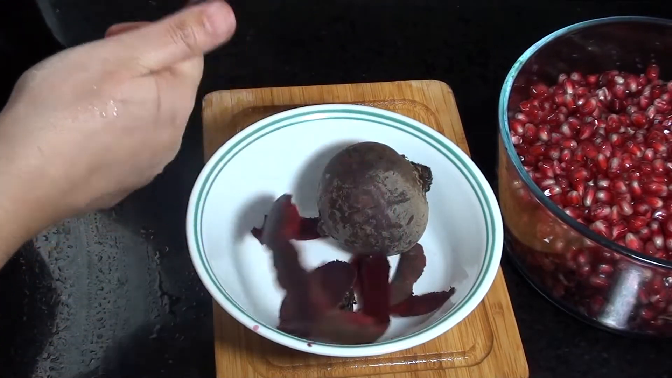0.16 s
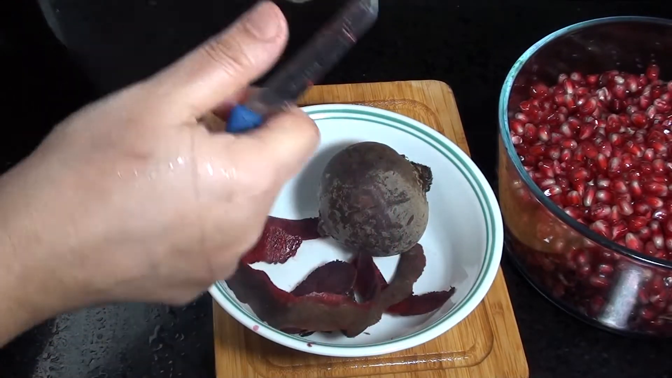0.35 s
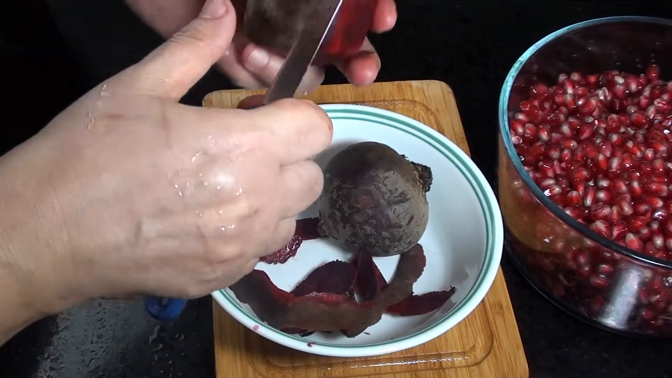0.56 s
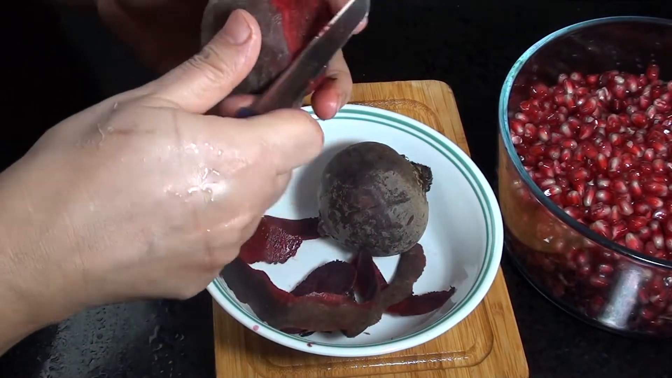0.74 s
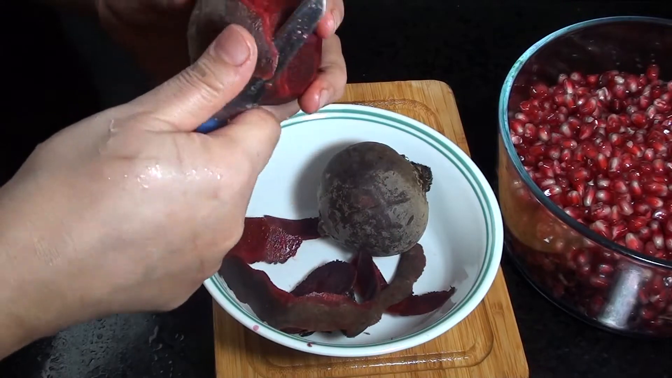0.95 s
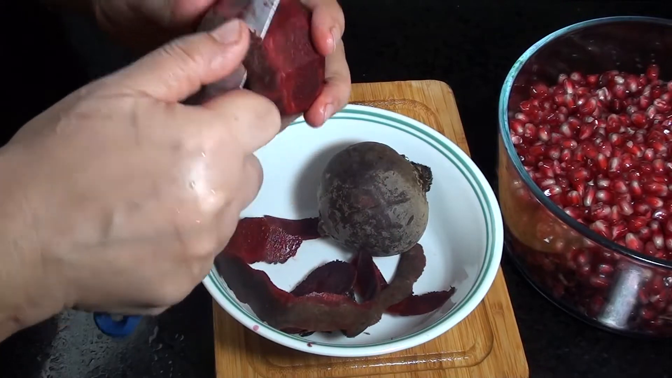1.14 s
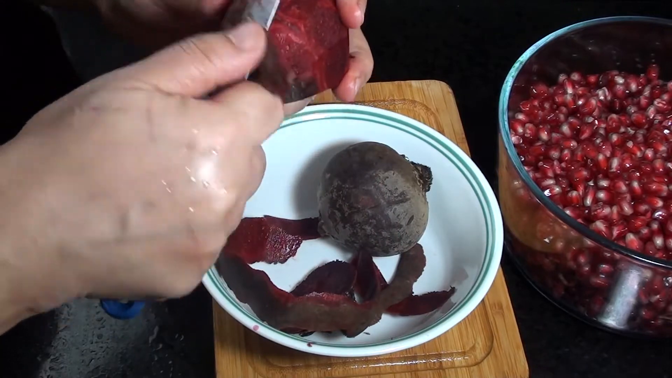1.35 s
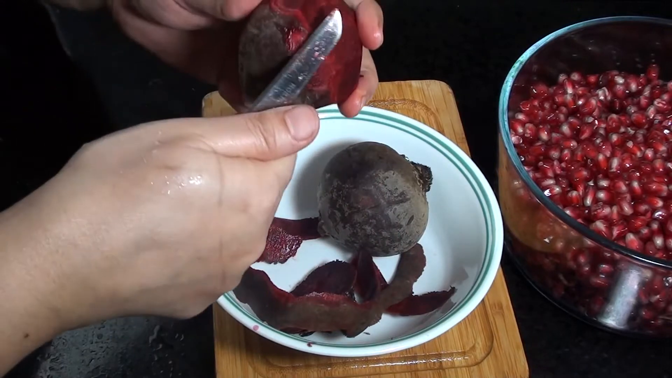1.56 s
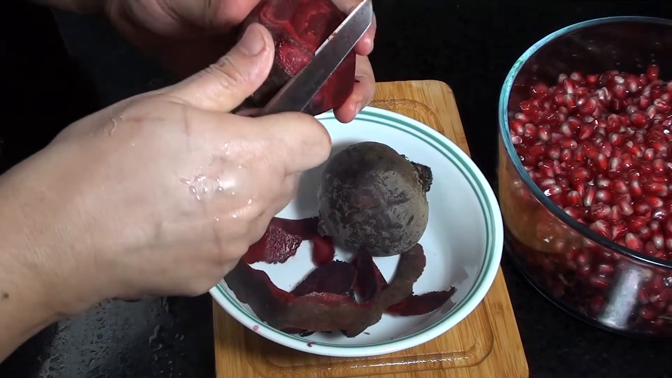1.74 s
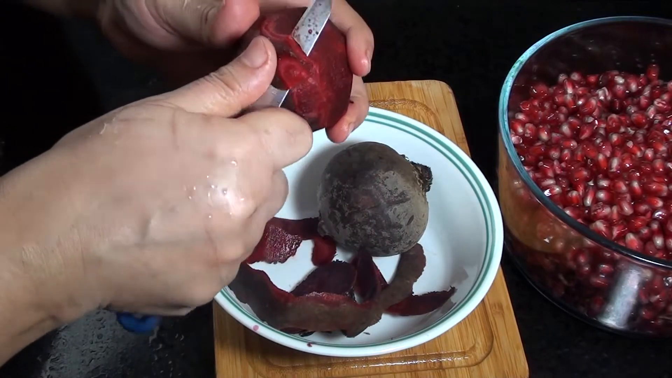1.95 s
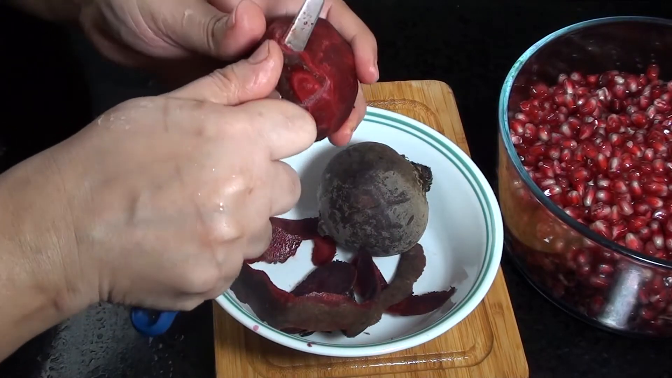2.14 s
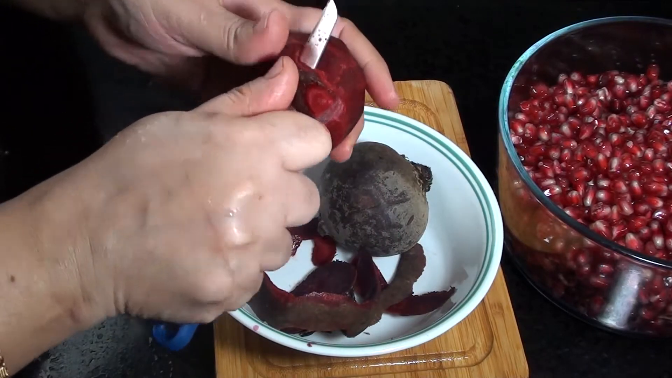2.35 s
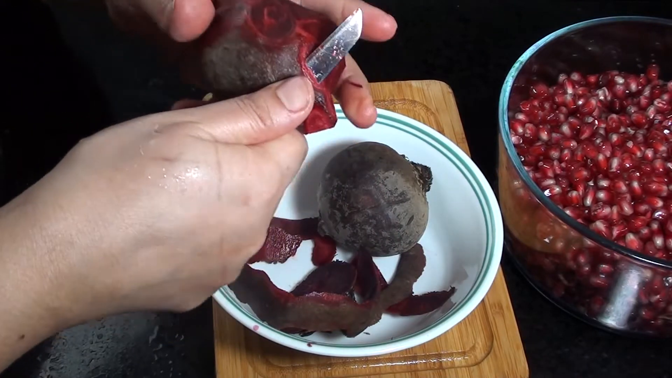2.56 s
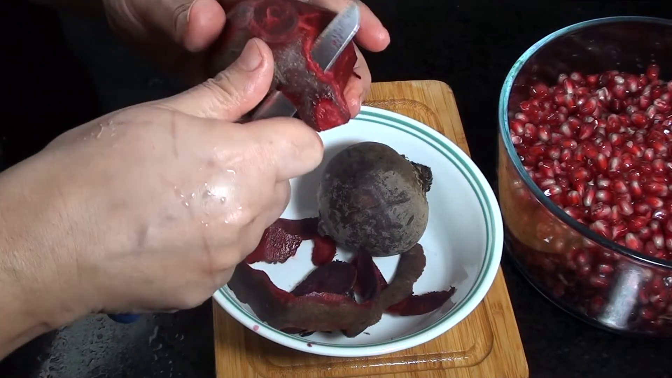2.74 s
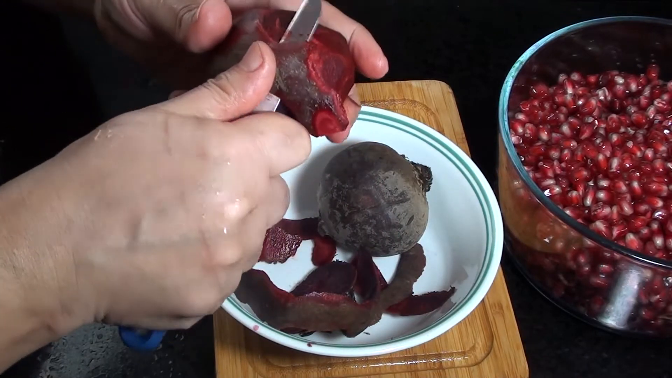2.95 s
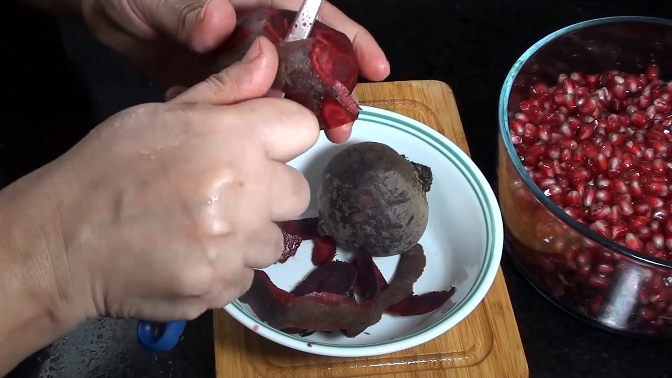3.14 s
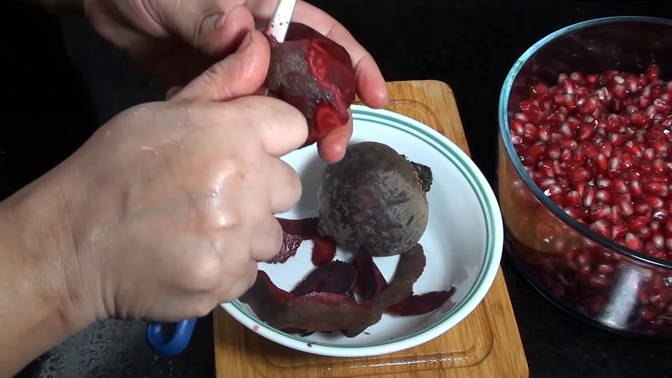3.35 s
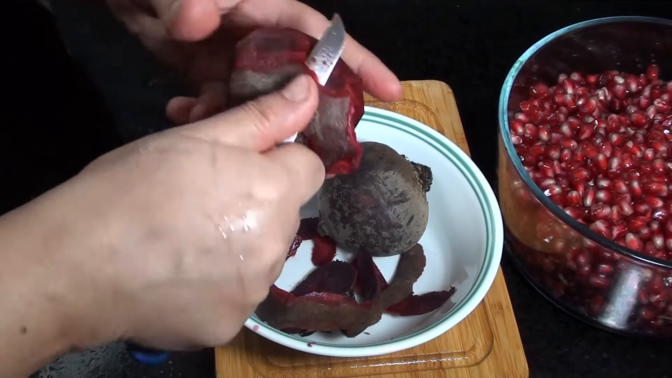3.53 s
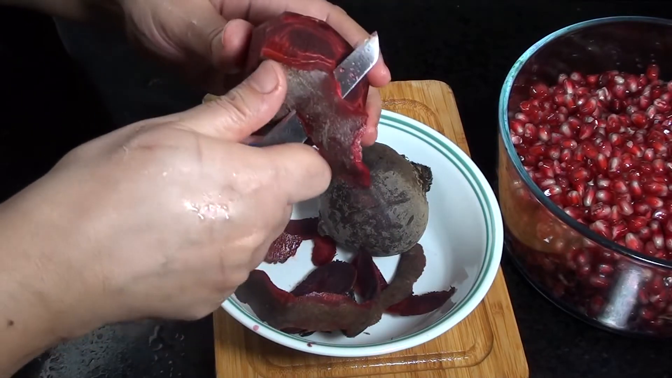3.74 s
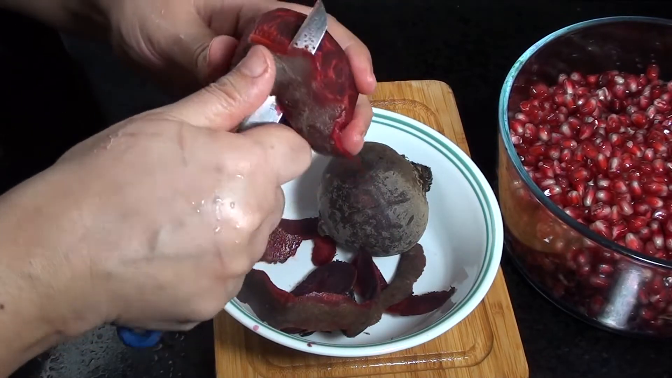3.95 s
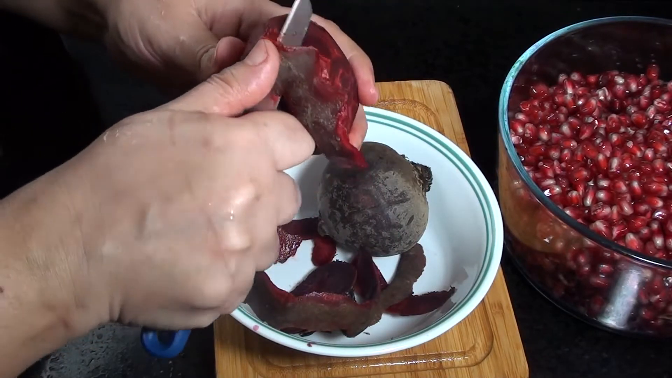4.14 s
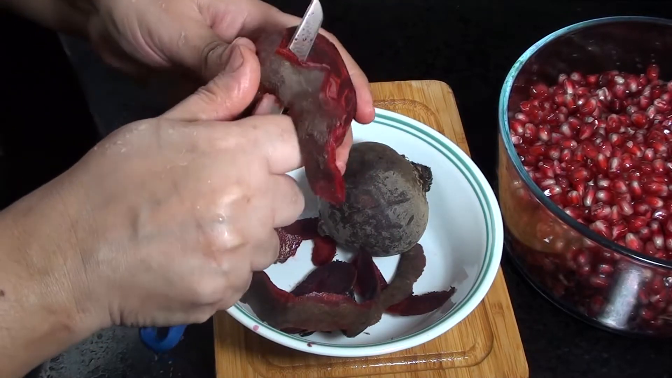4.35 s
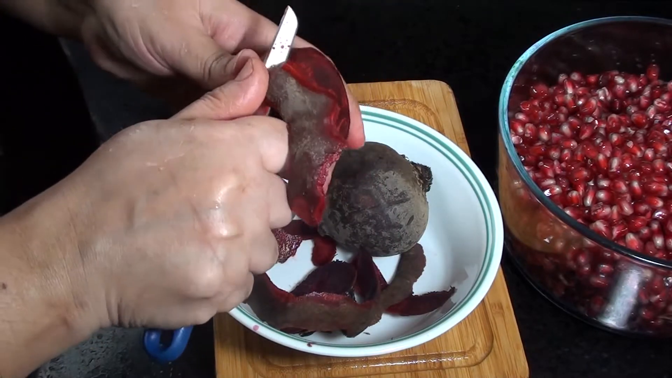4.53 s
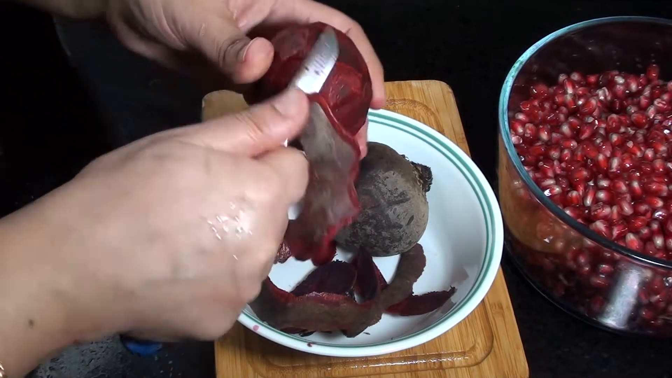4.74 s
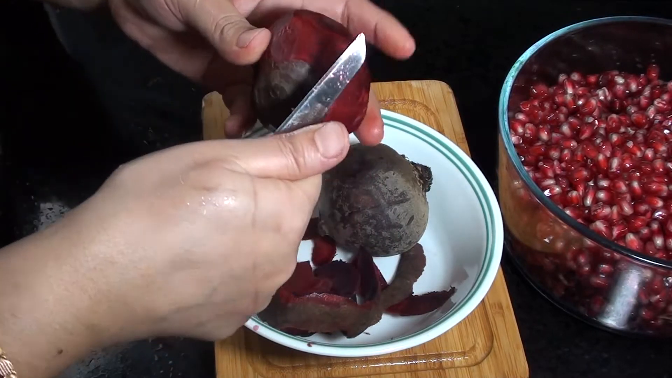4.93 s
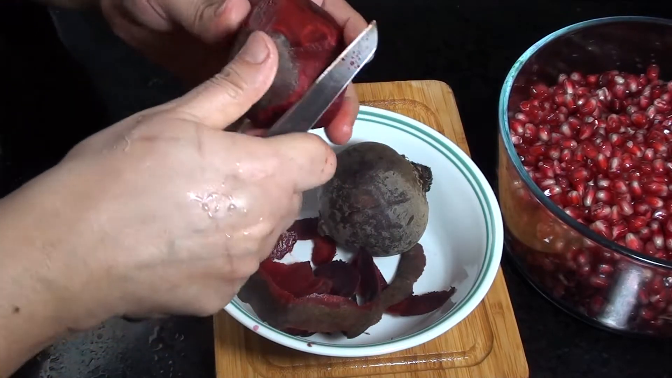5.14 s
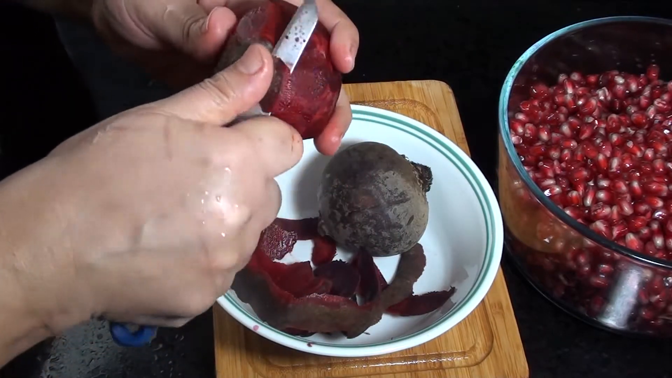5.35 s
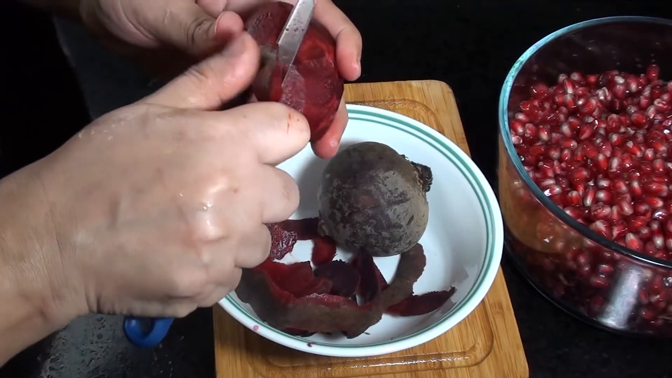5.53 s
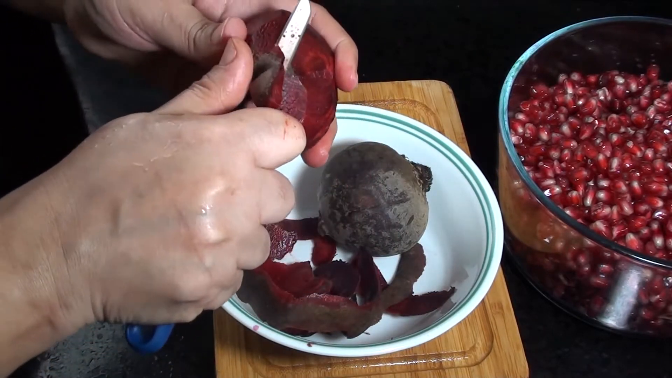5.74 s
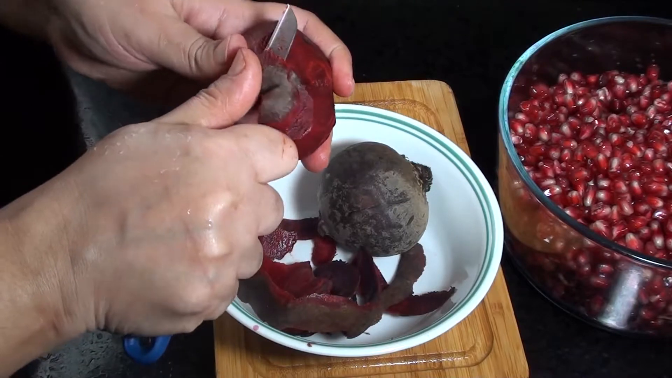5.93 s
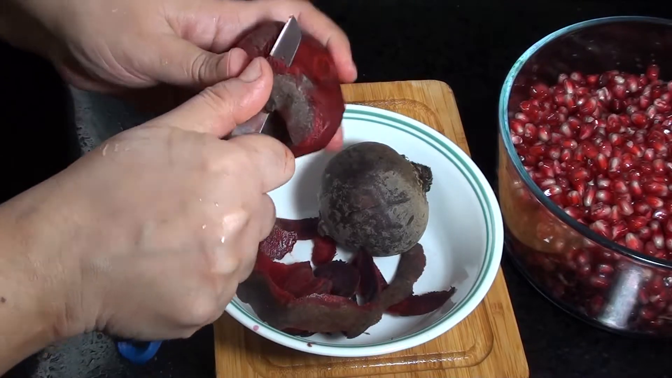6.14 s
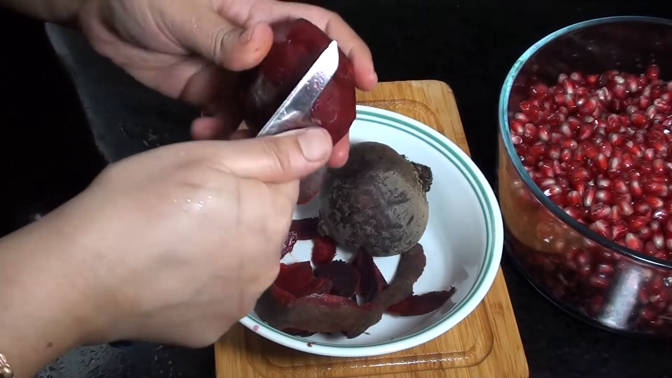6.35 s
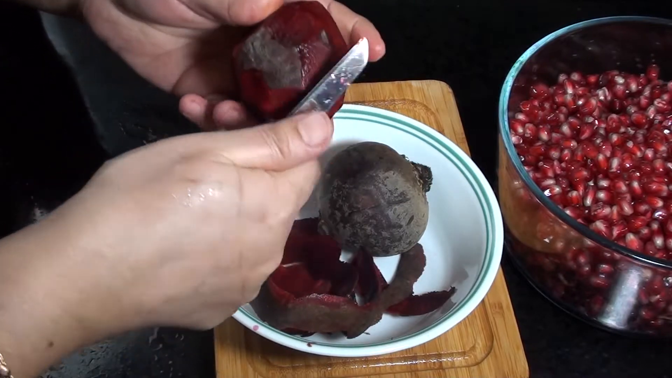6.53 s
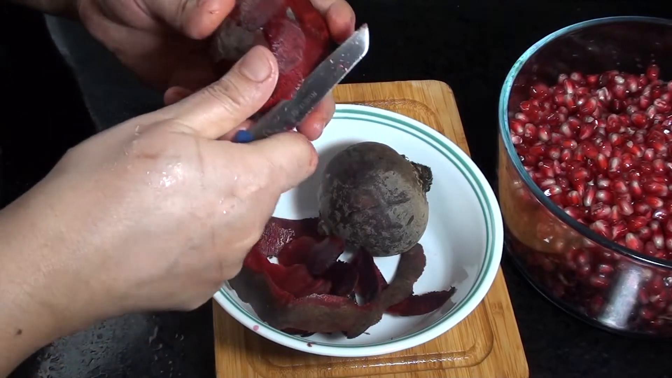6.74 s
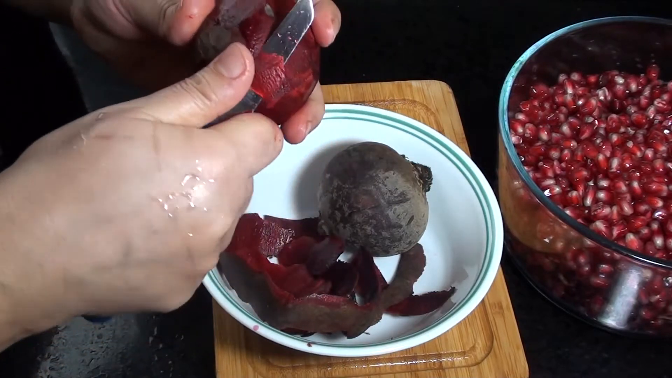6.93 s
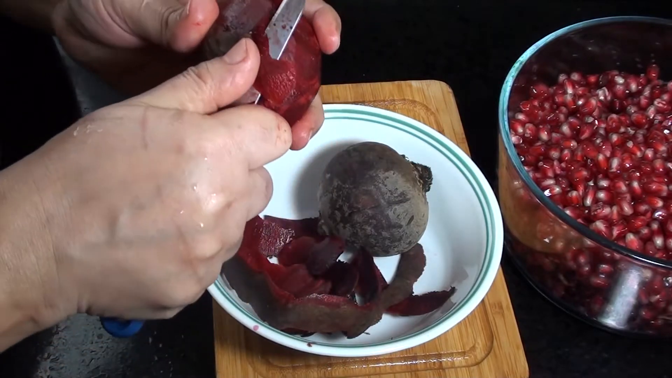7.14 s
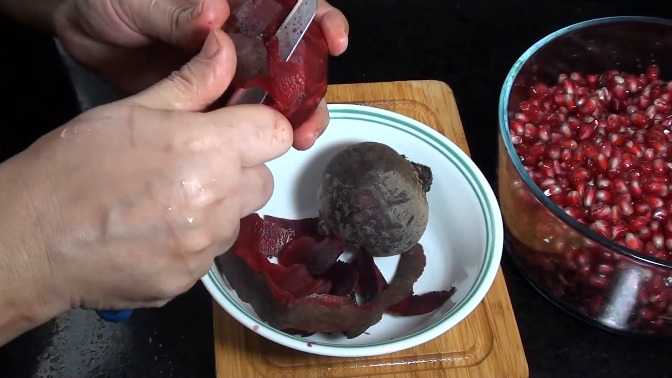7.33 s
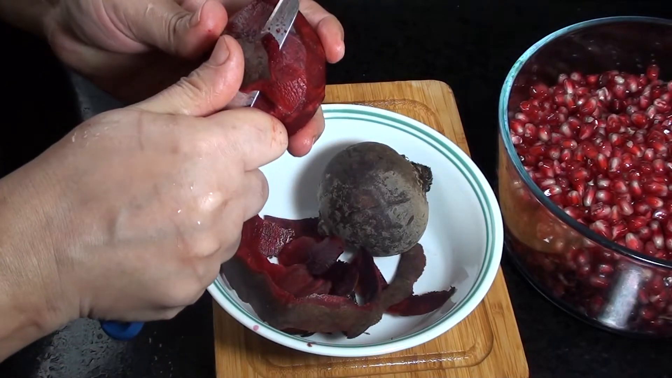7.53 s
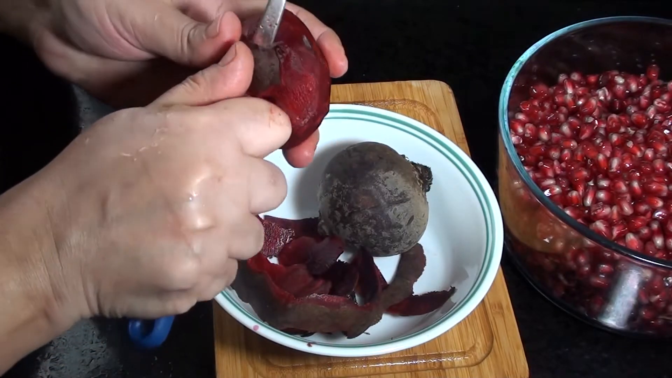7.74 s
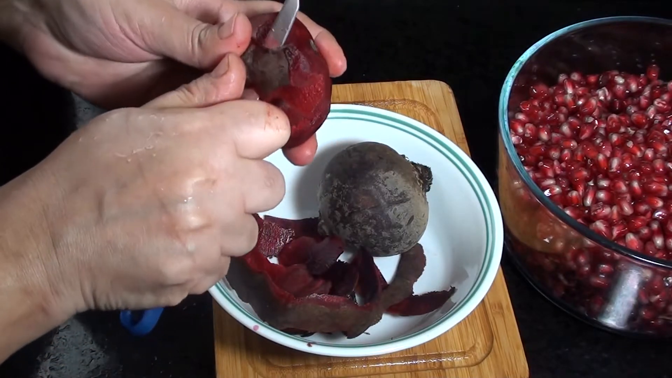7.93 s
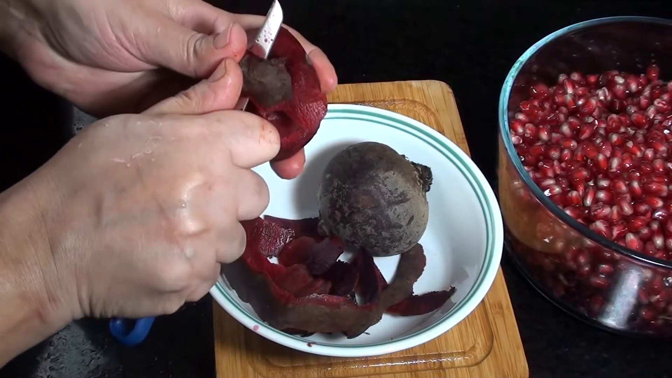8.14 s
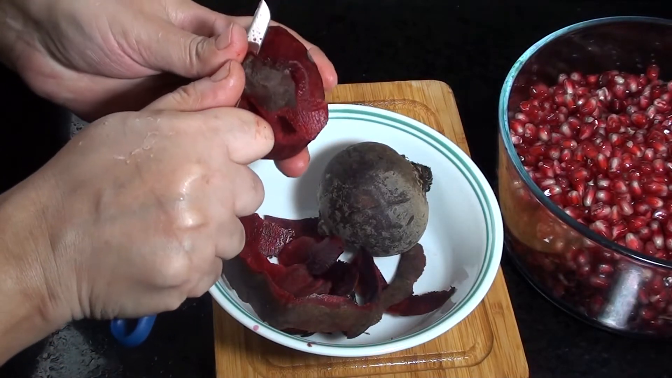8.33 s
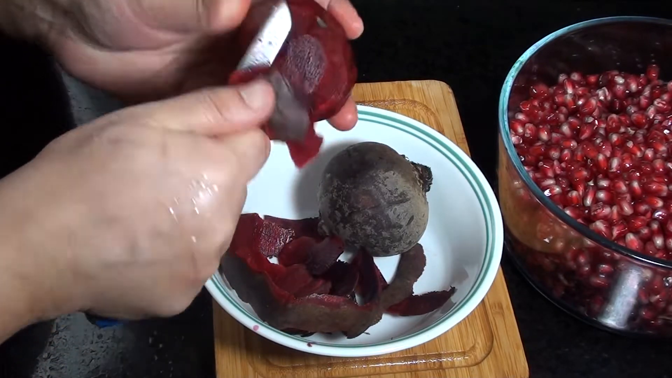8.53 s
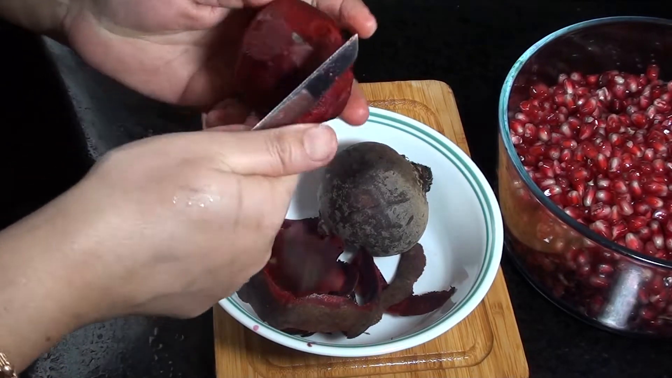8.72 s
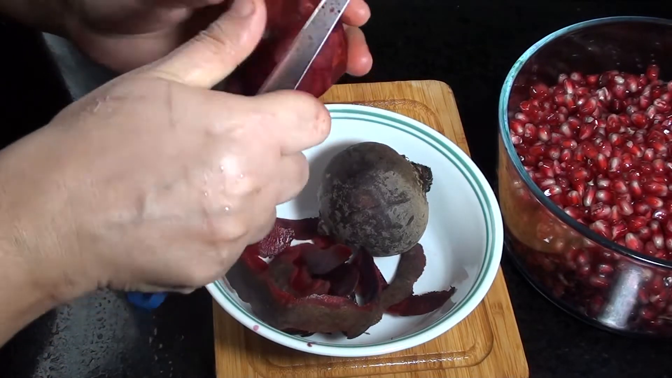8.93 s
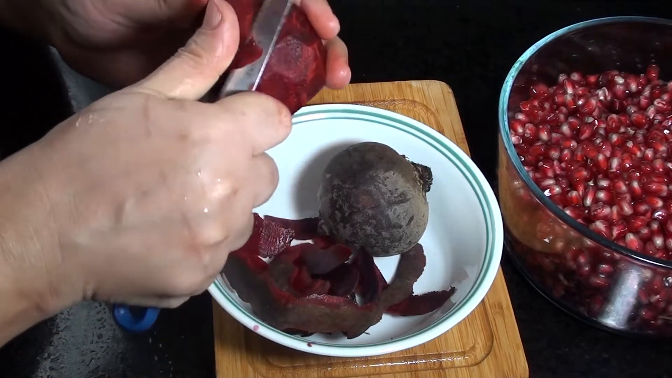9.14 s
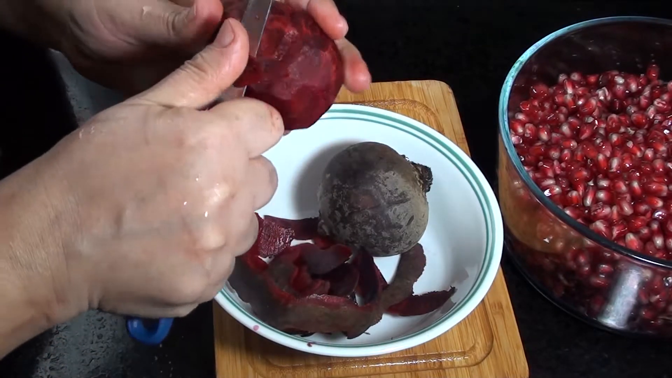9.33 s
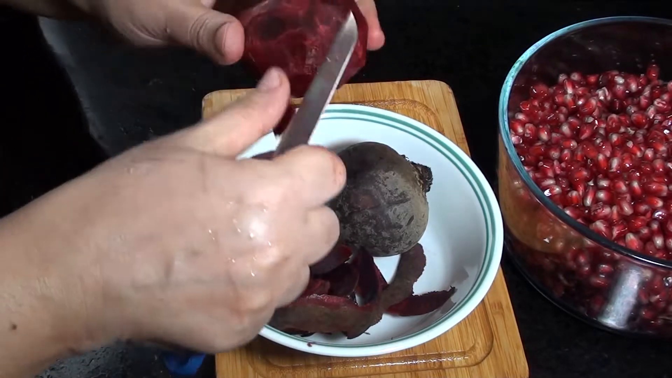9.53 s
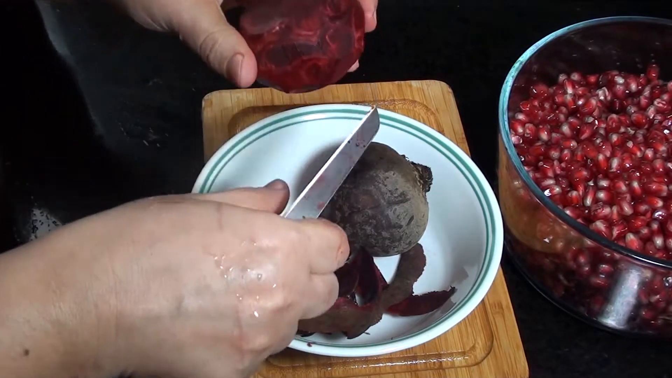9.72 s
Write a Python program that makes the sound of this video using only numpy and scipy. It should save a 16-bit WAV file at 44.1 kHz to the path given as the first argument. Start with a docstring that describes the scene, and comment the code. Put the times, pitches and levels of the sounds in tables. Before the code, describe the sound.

In a quiet kitchen with short reflections, a blade bites through firm, juicy root in uneven bursts of tiny pops and wet scraping, separated by brief pauses. Early strokes are soft; later ones crack sharply, some with bright clicks. Dull finger contacts, sticky rustling, faint squeaks and thin whistles lie between. A peel strip tears off late, then light metallic taps. Close stereo pickup over steady air and low hum.

```python
"""A knife blade peels a raw beetroot in a small kitchen, heard by two close microphones.
The blade moves in jerks, bursts of popping cells shaped by filters, over a wet scrape of noise.
Skin snaps are short sines; a strip of peel rips as noise bands falling in pitch.
Hands pat and rustle on the root and tap the ringing knife; thin, fuzzy tones whistle and squeak faintly.
The kitchen answers in echoes, over room air, an appliance hum built from sines and one faint low swell."""
import sys
import numpy as np
from scipy import signal
from scipy.fft import rfft, irfft, next_fast_len
from scipy.io import wavfile
from scipy.ndimage import uniform_filter1d, map_coordinates

SR = 44100
rng = np.random.default_rng(int(sys.argv[2]) if len(sys.argv) > 2 else 0)


def transcribe(u):
    """Save the signal u as a 16-bit wav file named by the first command-line argument.

    u: samples, shape (n,) or (channels, n), limited to [-1, 1]; the rate is SR.
    q: integer samples, one column per channel.
    """
    v = np.clip(np.atleast_2d(u).T, -1, 1)
    q = np.round(v * 32767).astype(np.int16)
    wavfile.write(sys.argv[1], SR, q)


N = 431293
TIME = np.arange(N) / SR
TOP_HZ = 15950  # upper band limit of the sound

# Room air spectrum [f/Hz, level/dB per Hz]
AIR_SPECTRUM = [(25, -26), (60, -22), (100, -12), (150, -11.5), (250, -11), (370, -10.5), (520, -10.5),
                (650, -11), (800, -13.5), (1000, -10.5), (1300, -21.5), (2000, -19.5), (4000, -19),
                (15800, -24)]
# Appliance hum partials [f/Hz, level/dB]
HUM_PARTIALS = [(59.2, -62), (119.7, -64.5), (177.6, -72.5), (296.1, -74), (355.3, -69.5), (1007, -76.5),
                (1955, -75)]
# Likeness of diffuse sound at the two microphones [f/Hz, likeness/1]
MIC_LIKENESS = [(60, .95), (125, 0.89), (250, 0.47), (500, 0.4), (1000, 0.14), (2000, 0.37), (5000, 0.77),
                (12000, 1)]
# Kitchen decay time [f/Hz, t60/s]
KITCHEN_T60 = [(300, 1), (2500, 0.48), (7500, 0.4), (11000, 0.42), (16000, 0.15)]
# Colour of the kitchen's answer [f/Hz, level/dB]
KITCHEN_COLOUR = [(300, -0.5), (2000, 5.5), (5000, 4.5), (7500, 2), (10000, 1.5), (16000, -6)]
# Soft contacts and finger rustle: spectrum [f/Hz, level/dB per Hz]
SOFT_SPECTRUM = [(120, -15), (400, -8), (650, 2), (900, -9), (1250, -0.5), (1700, -2), (2050, -5),
                 (2600, -9), (3200, -7), (4500, -10), (7500, -9), (14000, -28)]
# Wet scrape and knife ticks: spectrum [f/Hz, level/dB per Hz]
WET_SPECTRUM = [(250, -41), (1200, -9.5), (1950, -5.5), (2400, -14.5), (3050, -5.5), (4200, -3),
                (6300, -1.5), (8000, -1.5), (10000, -4), (16000, -14)]
# Crisp flesh bursting: spectrum [f/Hz, level/dB per Hz]
FLESH_SPECTRUM = [(150, -46), (600, -25.5), (1300, -16), (2300, -13.5), (3100, -7), (3900, -8.5),
                  (5500, -2.5), (7400, 1.5), (9000, -3.5), (12000, -5), (16000, -15.5)]
# Soft pats of fingers and peel [t/s, level before trim/dB]
PAT_EVENTS = [(0.124, -50.5), (0.519, -49), (2.585, -42.5), (3.212, -43.5), (3.664, -38), (4.728, -49),
              (5.974, -44.5), (6.263, -45.5), (7.433, -44), (7.56, -48), (7.703, -44.5), (7.969, -44.5)]
# Light taps on the knife [t/s, level before trim/dB]
TAP_EVENTS = [(0.495, -42.5), (7.407, -41.5), (9.657, -40.5), (9.689, -40.5)]
# Ringing of the knife [f/Hz, level within a tap/dB, t60/s]
KNIFE_MODES = [(1980, -7, 0.13), (2075, 0.5, 0.073), (3150, -10, 0.14), (5420, -4.5, 0.027),
               (6420, 9, 0.016)]
# Strokes of the blade under the skin [start t/s, length/s, force level/dB]
BLADE_STROKES = [(0.863, 0.26, -52), (1.115, 0.034, -49.5), (1.745, 0.31, -53), (2.202, .11, -53.5),
                 (2.377, 0.083, -55), (2.667, 0.35, -55.5), (3.08, 0.023, -51), (3.823, 0.29, -51),
                 (4.249, 0.063, -47.5), (4.427, .13, -56), (5.104, .33, -55), (6.095, 0.097, -47.5),
                 (6.675, 0.13, -50.5), (6.819, 0.25, -50.5), (7.619, 0.012, -47.5), (7.685, 0.021, -46.5),
                 (9.04, 0.159, -50)]
# Blade singing as it bites [f/Hz, width/Hz, level relative to the force/dB]
BLADE_MODES = [(1610, 83, -15.5), (3005, 130, -10), (6330, 1000, -1)]
# Big jerks, where the blade breaks through [t at the peak/s, level/dB, time scale/s, sparkle/dB]
BIG_JERKS = [(.919, -40, .011, -7), (0.946, -36.5, .01, -4), (0.993, -37, 0.0059, 1), (1.014, -37, .007, 0),
             (1.808, -38, 0.01, -4), (1.842, -30.5, 0.0079, 3.5), (1.873, -31.5, 0.0075, 1),
             (1.918, -28.5, 0.0076, 2.5), (1.945, -41, .005, 6), (1.978, -32.5, 0.012, 8.5),
             (2.067, -29, .012, 1), (2.091, -30, 0.011, -5), (2.112, -37, .01, -5), (2.239, -39, 0.0015, 4),
             (2.687, -27, 0.0019, 3.5), (2.772, -32.5, 0.0033, -16), (2.793, -27.5, 0.0041, -5),
             (2.846, -28, 0.0083, 3), (2.886, -25, 0.01, 0), (2.915, -30.5, .005, -2),
             (2.969, -30, 0.015, 2), (3.193, -26.5, 0.0068, -7), (3.244, -25.5, 0.025, 4),
             (3.25, -20.5, 0.014, -17), (3.851, -29, 0.0045, 3), (3.891, -25, 0.018, -1),
             (3.946, -35, 0.0037, -3), (3.96, -23, .01, -3), (3.991, -32, .007, 0),
             (4.023, -31, 0.0062, -2), (4.049, -34, 0.014, -0.5), (4.143, -33, 0.01, -3),
             (4.241, -32, 0.0037, 2), (4.261, -25.5, 0.0027, -10), (4.282, -33, 0.002, -2),
             (4.425, -21.5, 0.0062, -2), (4.437, -28, 0.014, 0), (4.562, -37.5, 0.019, 16),
             (5.21, -43.5, .02, -6), (5.23, -37.5, .006, 1), (5.257, -35, 0.014, 3),
             (5.284, -28, 0.0095, 1.5), (5.312, -36.5, 0.013, -2), (5.532, -40.5, 0.041, -1.5),
             (5.692, -32, 0.019, -4), (5.725, -28, 0.011, -6), (5.846, -18.5, 0.012, -4),
             (5.996, -33.5, 0.0019, 1.5), (6.12, -18.5, 0.0044, 3.5), (6.137, -24.5, 0.032, 6),
             (6.152, -24.5, 0.024, -11), (6.834, -32, 0.018, -7), (6.861, -33, 0.012, -2),
             (6.921, -36, 0.006, 3), (7.03, -36.5, .01, -7), (7.06, -37.5, 0.012, -6),
             (7.095, -30.5, .005, 2), (7.141, -30, 0.0046, 5.5), (7.433, -22.5, 0.0094, 0),
             (7.56, -30, 0.017, -5), (8.072, -25.5, 0.012, 2), (8.252, -29, 0.018, 5.5),
             (8.259, -30, 0.024, 10), (9.117, -43.5, 0.019, -12), (9.143, -34.5, 0.015, 2),
             (9.166, -25.5, 0.0077, 0.5)]
# Thin faint whistles near 6 kHz and low squeaks near 2 kHz
# [start t/s, length/s, level before the arch/dB, top f/Hz]
THIN_TONES = [(.99, .17, -63.5, 1975), (1.202, .23, -62, 6170), (1.444, 0.2, -62.5, 6160),
              (6.886, 0.075, -59, 2020), (9.2, 0.061, -62.5, 2010), (9.65, 0.06, -59, 1985)]
# Faint low drone, one swell [start t/s, length/s, level at the top/dB, f/Hz]
LOW_DRONE = (2.5, 0.95, -65.5, 377)
# Stiff skin snapping through [t/s, level before build-up and decay/dB, f/Hz]
SKIN_SNAPS = [(3.2524, -3.5, 6220), (5.846, -19, 7100), (6.121, -5, 7750), (6.137, -2, 8200),
              (6.1508, -0.5, 7420)]
# Strip of peel ripping free [t/s, level before flutter/dB, centre f/Hz]
RIP_PATH = [(8.26, -34, 13800), (8.31, -57, 14500), (8.375, -57, 14000), (8.395, -40, 12800),
            (8.425, -34, 11000), (8.44, -44, 9100), (8.465, -57, 7800)]


def amp(db):
    """Level in dB to amplitude."""
    return 10 ** (np.asarray(db) / 20)


def unit(x):
    """Scale to rms 1."""
    return x / np.sqrt(np.mean(x ** 2) + 1e-20)


def along(points, hz):
    """Interpolate (f/Hz, value) points on a log frequency axis."""
    f, v = np.transpose(points)
    return np.interp(np.log(hz + 1), np.log(f), v)


def gain_curve(s, db):
    """Gain per sample through points in dB, silent outside them."""
    return amp(np.interp(TIME, s, db, left=-200, right=-200))


def wobble(rate):
    """A smooth random curve with `rate` knots a second."""
    return map_coordinates(rng.standard_normal(int(N * rate / SR) + 4), [TIME * rate])


def arch_at(s, length):
    """Half a sine from 0 up to 1 and back, zero outside."""
    return np.abs(np.sin(np.pi * np.clip((TIME - s) / length, 0, 1)))


def add(track, s, sound):
    """Mix a sound into a track at time s."""
    part = track[..., max(round(s * SR), 0):][..., :sound.shape[-1]]
    part += sound[..., :part.shape[-1]]


def coloured(x, db_of_hz):
    """Causal (minimum-phase) filter with the given dB response, by folding the cepstrum."""
    size = 2 * next_fast_len(len(x) // 2 + 512)
    hz = np.fft.rfftfreq(size, 1 / SR)
    cepstrum = irfft(np.log(amp(db_of_hz(hz))))
    cepstrum[1:size // 2] *= 2
    cepstrum[size // 2 + 1:] = 0
    response = np.exp(rfft(cepstrum))
    return irfft(rfft(x, size) * response)[:len(x)]


def narrow(x, hz, width_hz):
    """x through one resonance, at rms 1."""
    return unit(signal.lfilter(*signal.iirpeak(hz, hz / width_hz, fs=SR), x))


def pops(size, spread_db):
    """Dense bursting cells: random sizes in dB make most of them small and a few stand out."""
    cell_db = spread_db * np.clip(rng.standard_normal(size), -3, 2.5)
    return rng.standard_normal(size) * amp(cell_db)


def stereo(mid, side):
    """Diffuse sound at two close microphones: mid and side are shared out by their likeness."""
    hz = np.fft.rfftfreq(mid.shape[-1], 1 / SR)
    turn = np.arccos(np.clip(along(MIC_LIKENESS, hz), -1, 1)) / 2
    m = irfft(rfft(mid) * np.cos(turn), len(mid))
    s = irfft(rfft(side) * np.sin(turn), len(side))
    return np.array([m + s, m - s])


def background(air_db=-56, waver_db=0.04):
    """Steady room air is coloured noise; the appliance hum is sines unsteady in level and phase."""
    size = next_fast_len(N)
    mid, side = [coloured(rng.standard_normal(size), lambda hz: along(AIR_SPECTRUM, hz)) for _ in range(2)]
    air = stereo(mid, side)[:, :N]
    hum = np.zeros(N)
    for hz, db in HUM_PARTIALS:
        level = amp(db + waver_db * wobble(3.01)) * np.sqrt(2)  # rms to peak
        phase = 2 * np.pi * (hz * TIME + rng.random()) + 0.26 * wobble(2.08)
        hum += level * np.sin(phase)
    return amp(air_db) * unit(air) + hum


def fingers(level_db=-66, spread_db=9):
    """Damp fingers keep shifting on the root: a faint, sticky rustle of uneven grains."""
    sticky = coloured(pops(N, spread_db), lambda hz: along(SOFT_SPECTRUM, hz))
    shifting = amp(2.5 * wobble(22))
    return amp(level_db) * unit(sticky * shifting)


def pats(t60=0.077, trim_db=-1):
    """Soft, dull contacts that do not ring: decaying puffs of coloured noise."""
    out, t = np.zeros(N), np.arange(SR // 5) / SR
    for s, db in PAT_EVENTS:
        puff = unit(coloured(rng.standard_normal(len(t)), lambda hz: along(SOFT_SPECTRUM, hz)))
        add(out, s, amp(db + trim_db - 60 * t / t60) * puff)
    return out


def taps(trim_db=-8, tick_t60=0.01, rough=0.41):
    """A noise tick with the ring of the knife's modes, made rough by the rubbing grip."""
    out, t = np.zeros(N), np.arange(SR // 4) / SR
    for s, db in TAP_EVENTS:
        # the ring's time wanders in random steps of `rough` samples rms
        clock = t + np.cumsum(rough * rng.standard_normal(len(t))) / SR
        ring = np.zeros(len(t))
        for hz, level, t60 in KNIFE_MODES:
            ring += amp(level - 60 * t / t60) * np.sin(2 * np.pi * hz * clock)
        tick = unit(coloured(rng.standard_normal(len(t)), lambda hz: along(WET_SPECTRUM, hz)))
        tick *= amp(-60 * t / tick_t60)
        add(out, s, amp(db + trim_db) * (ring + tick))
    return out


def pressure(attack_s=0.0125, release_s=0.03, dig_s=0.14):
    """Force and depth (0-1) of the blade: each stroke bites, digs in, holds and lets go."""
    force, depth = np.zeros(N), np.zeros(N)
    for s, length, db in BLADE_STROKES:
        bite = np.clip((TIME - s) / attack_s + 1, 0, 1)
        release = np.clip((s + length - TIME) / release_s + 1, 0, 1)
        gate = bite * release
        force += gate * amp(db)
        depth = np.where(gate > 0, gate * np.clip((TIME - s) / dig_s, 0, 1), depth)
    return force, depth


def scrape(force, spread_db=7, judder_db=4.5, trim_db=-2, ticks_per_s=70, tick_db=-7):
    """The pressed blade judders through wet flesh as uneven noise, and single fibres tick."""
    grains = unit(pops(N, spread_db) * amp(judder_db * wobble(110)))
    ticks = unit((rng.random(N) < ticks_per_s / SR) * rng.standard_normal(N))
    wet = coloured(grains + amp(tick_db) * ticks, lambda hz: along(WET_SPECTRUM, hz))
    return amp(trim_db) * force * unit(wet)


def singing(force, depth, trim_db=-6, damping_db=7, spread_db=5):
    """Friction rings the free blade; the flesh damps it as it sinks in."""
    rub = pops(N, spread_db)
    ring = sum(amp(db) * narrow(rub, hz, width) for hz, width, db in BLADE_MODES)
    return amp(trim_db - damping_db * depth) * force * ring


def stutters(force, depth, per_s=36, scatter=0.35, over_db=5.5, scatter_db=3.5,
             shallow_db=11, rest_s=0.016, length_s=0.007, sparkle_db=-2):
    """Stick and slip through a stroke: uneven small jerks, weaker while shallow, none by a big jerk."""
    chance = rng.standard_normal((int(N / SR * per_s), 2))
    times = (np.arange(len(chance)) + scatter * chance[:, 0]) / per_s
    push, deep = np.interp(times, TIME, force), np.interp(times, TIME, depth)
    slip_db = over_db - shallow_db * (1 - deep) + scatter_db * chance[:, 1]
    to_big_jerk = np.abs(times[:, None] - np.array(BIG_JERKS)[:, 0]).min(axis=1)
    free = (push > 0) & (to_big_jerk > rest_s)
    levels = 20 * np.log10(push[free]) + slip_db[free]
    return [(s, db, length_s, sparkle_db) for s, db in zip(times[free], levels)]


def avalanche(size, splits_per_s=650, split_s=0.00033, fizz=0.23):
    """Tissue gives way in small splits, each a sharp start and a quickly dying spray of cells."""
    starts = (rng.random(size) < splits_per_s / SR) * rng.uniform(0.41, 2.6, size)
    return fizz + signal.lfilter([1], [1, -np.exp(-1 / (split_s * SR))], starts)


def jerk_body(db, length, sparkle_db, usual_db=-30.5, usual_s=0.012):
    """Low-band level in dB: long jerks cut deeper; hard jerks and thin, sparkling slices lose body."""
    body_db = -1.5 - 0.21 * (db - usual_db)  # dB of body lost per dB of level
    body_db += 2 * np.log2(length / usual_s)  # dB per doubling of length
    body_db -= 0.33 * max(sparkle_db, 0)  # dB per dB of sparkle
    return body_db + rng.standard_normal()  # 1 dB of random variation


def jerks(rows, spread_db=4.5, fall_db=19, rise_db=110, lead_s=0.02):
    """Each jerk is an avalanche of popping cells with an abrupt start and a slower end."""
    out, t = np.zeros(N), np.arange(SR // 12) / SR - lead_s
    for s, db, length, sparkle_db in rows:
        age = t / length
        swell = amp(np.where(age < 0, -rise_db * age ** 2, -fall_db * age))
        tint = [(2500, jerk_body(db, length, sparkle_db)), (5500, 0), (8500, 0), (12500, sparkle_db)]
        cells = swell * avalanche(len(t)) * pops(len(t), spread_db)
        burst = coloured(cells, lambda hz: along(FLESH_SPECTRUM, hz) + along(tint, hz))
        loudest = uniform_filter1d(burst ** 2, SR // 250).max()  # power over 4 ms
        add(out, s - lead_s, amp(db) * burst / np.sqrt(loudest))
    return out


def thin_tones(sag=0.08, waver=0.016):
    """Thin, fuzzy tones: high whistles and low squeaks, pitch and level sagging at both ends."""
    out = np.zeros(N)
    for s, length, db, hz in THIN_TONES:
        arch = arch_at(s, length)
        bend = 1 - sag * (1 - np.sin(np.pi / 2 * arch ** 2))
        pitch = hz * bend * (1 + waver * wobble(620))
        tone = np.sin(2 * np.pi * np.cumsum(pitch) / SR) * wobble(330)
        out += amp(db) * np.sqrt(arch) * unit(tone)
    return out


def drone(width_hz=50):
    """A faint, low noise band, narrowed by two resonances, comes and goes."""
    s, length, db, hz = LOW_DRONE
    once = narrow(rng.standard_normal(N), hz, width_hz)
    return amp(db) * np.sqrt(arch_at(s, length)) * narrow(once, hz, width_hz)


def snaps(t60=0.0045):
    """Where the skin breaks at once, it gives one hard click: a quickly dying sine."""
    out, t = np.zeros(N), np.arange(SR // 50) / SR
    for s, db, hz in SKIN_SNAPS:
        onset = 1 - np.exp(-t * hz)  # time constant of one cycle
        add(out, s, amp(db - 60 * t / t60) * onset * np.sin(2 * np.pi * hz * t))
    return out


def rip(width=0.13, flutter_db=4, spread_db=6):
    """The last fibres part in a fine fizz that falls in pitch as the strip comes loose."""
    s, db, hz = np.transpose(RIP_PATH)
    centre, out = np.interp(TIME, s, hz), np.zeros(N)
    for band_hz in np.geomspace(7000, 15000, 5):
        fizz = narrow(pops(N, spread_db), band_hz, band_hz / 5)
        out += fizz * np.exp(-(np.log(centre / band_hz) / width) ** 2)
    return out * gain_curve(s, db) * unit(amp(flutter_db * wobble(300)))


def kitchen(x, near_db, room_db, near_t60=0.027):
    """Near echoes come at once, walls linger; the pattern is redrawn at random every quarter second."""
    out, block = np.zeros((2, N)), SR // 4
    for start in range(0, N, block):
        hz, t, z = signal.stft(rng.standard_normal((2, SR // 2)), SR, nperseg=256)
        fade_db = along(KITCHEN_COLOUR, hz)[:, None] - 60 * t / along(KITCHEN_T60, hz)[:, None]
        tail = stereo(*signal.istft(z * amp(fade_db), SR, nperseg=256)[1])
        age = np.arange(tail.shape[1]) / SR
        near = stereo(*rng.standard_normal((2, len(age))))
        near = near * amp(-60 * age / near_t60) * (age > 0.001)
        walls = amp(room_db) * tail / np.linalg.norm(tail[0])
        answer = walls + amp(near_db) * near / np.linalg.norm(near[0])
        add(out, start / SR, signal.fftconvolve(x[None, start:start + block], answer, axes=1))
    return x + out


def scene():
    """Cutting, handling and thin tones close by in the same kitchen, over its steady background."""
    force, depth = pressure()
    blade = jerks(BIG_JERKS) + jerks(stutters(force, depth)) + scrape(force) + singing(force, depth)
    cutting = blade + snaps() + rip()
    handling_and_tones = pats() + taps() + fingers() + thin_tones()
    close = kitchen(cutting, near_db=-3, room_db=-12)
    close += kitchen(handling_and_tones, near_db=-0.5, room_db=-2.5)
    return close + background() + drone()


def record(dry):
    """Nothing sounds above the band limit."""
    size = next_fast_len(N + SR // 10)
    passed = np.fft.rfftfreq(size, 1 / SR) < TOP_HZ
    return irfft(rfft(dry, size) * passed, size)[:, :N]


dry = scene()
out = record(dry)
transcribe(out)
```